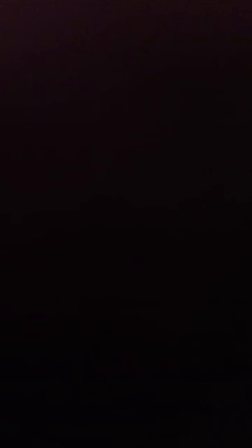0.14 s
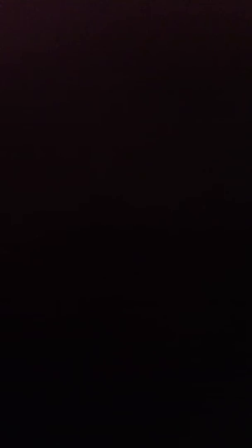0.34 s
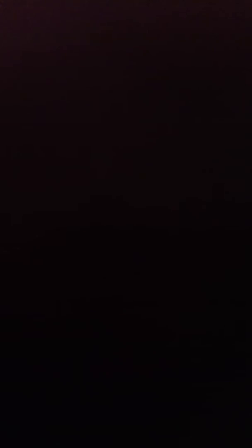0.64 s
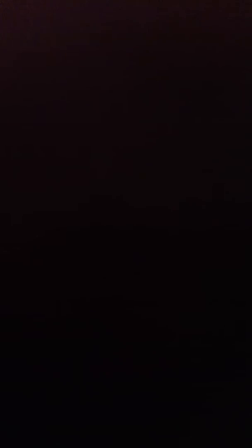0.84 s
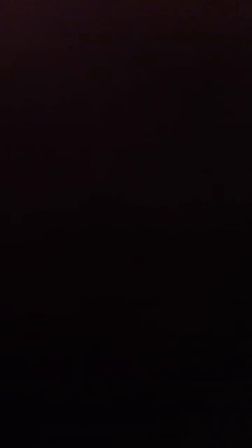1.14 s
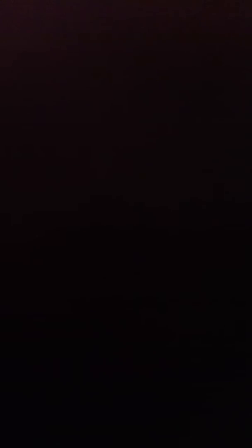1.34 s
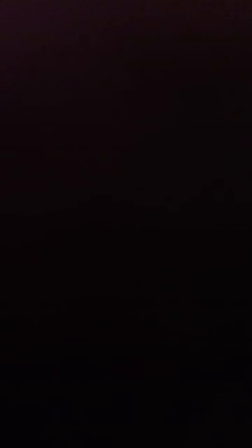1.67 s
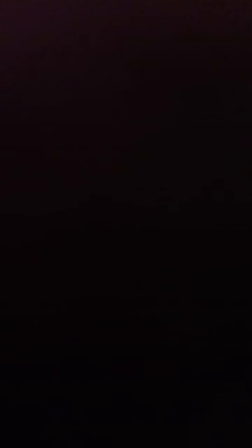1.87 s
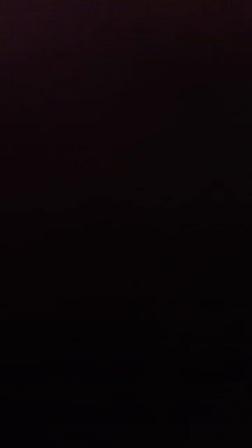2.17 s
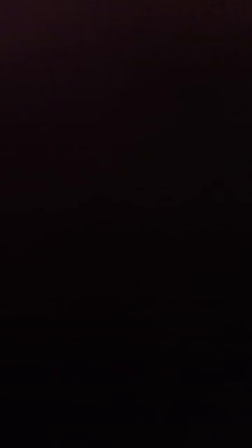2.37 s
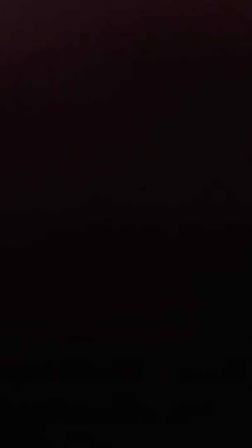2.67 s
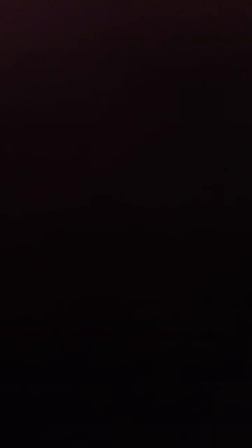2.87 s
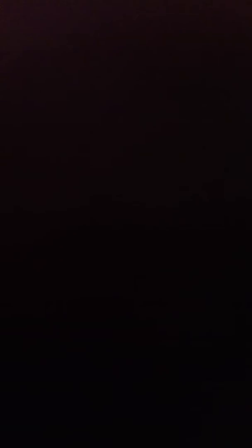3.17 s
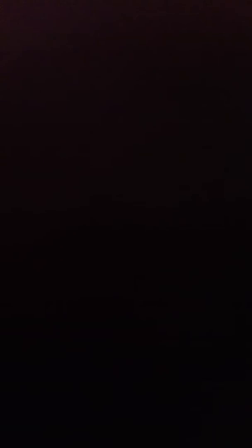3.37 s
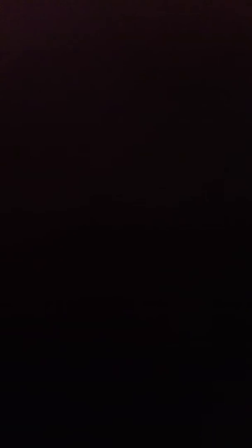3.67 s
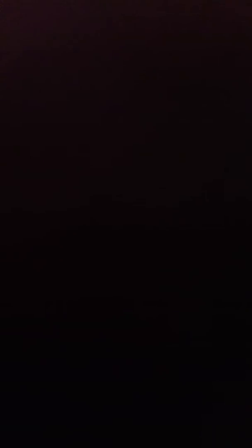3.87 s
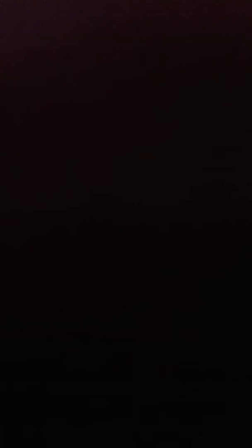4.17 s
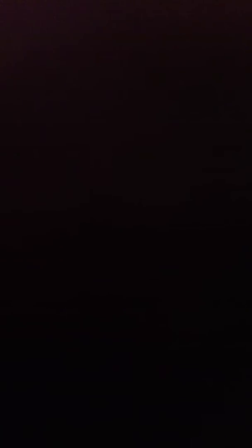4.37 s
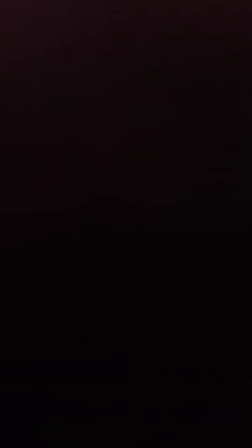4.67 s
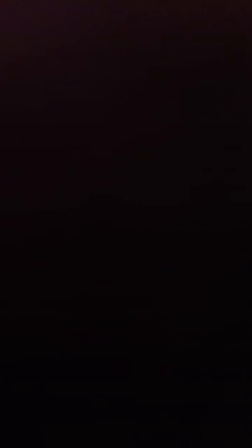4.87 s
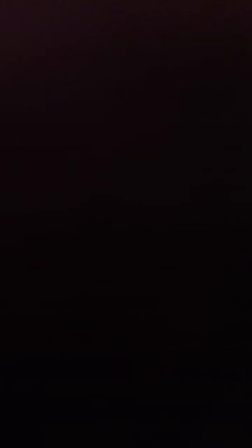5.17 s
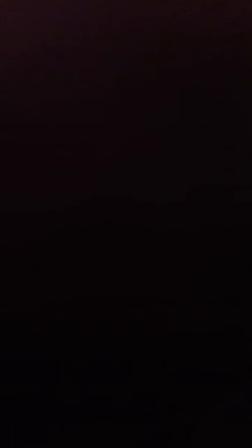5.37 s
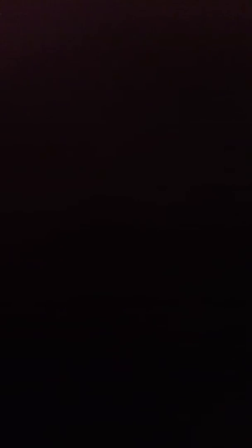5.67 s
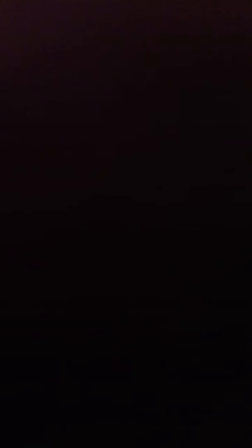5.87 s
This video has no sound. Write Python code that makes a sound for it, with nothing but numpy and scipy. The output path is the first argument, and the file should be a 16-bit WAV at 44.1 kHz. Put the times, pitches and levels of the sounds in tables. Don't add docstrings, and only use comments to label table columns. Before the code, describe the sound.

Very close microphone in a quiet room. Soft, crackly cloth brushes come first, then a sudden latch-like knock rattles. A hollow wooden object drags roughly over a surface for about two seconds, booming, hissing and bumping. After a brief lull, a bump starts a shorter, juddering drag, ending in a dull edge rub and faint rustling.

```python
import sys
import numpy as np
from scipy import signal
from scipy.io import wavfile
from scipy.ndimage import uniform_filter1d

SR = 44100
rng = np.random.default_rng(int(sys.argv[2]) if len(sys.argv) > 2 else 0)


def gain_from_decibels(decibels):
    exponent = np.asarray(decibels, float) / 20
    return 10 ** exponent


def unload_audio(sound):
    columns = np.transpose(np.atleast_2d(sound))
    steps = np.round(np.clip(columns, -1, 1) * 32767)
    wavfile.write(sys.argv[1], SR, steps.astype(np.int16))


N = 265482


def rms_one(x):
    return x / np.sqrt(np.mean(x ** 2) + 1e-20)


def at_hz(points, hz):
    table = np.array(points)
    return np.interp(np.log(hz), np.log(table[:, 0]), table[:, 1])


def drift(rate_hz):
    r = np.exp(-80 * np.pi * rate_hz / SR)
    noise = rng.standard_normal(N // 40 + 2002)
    slow = signal.lfilter([1], [1, -2 * r, r * r], noise)[2000:]
    return np.interp(np.arange(N) / 40, np.arange(len(slow)), rms_one(slow))


def resonate(x, hz, width_hz):
    r = np.exp(-np.pi * width_hz / SR)
    feedback = [1, -2 * r * np.cos(2 * np.pi * hz / SR), r * r]
    return signal.lfilter([(1 - r * r) / 2, 0, (r * r - 1) / 2], feedback, x)


def grit(per_s, spread_db):
    sizes = gain_from_decibels(spread_db * np.minimum(rng.exponential(1, N), 5)) * rng.choice([-1, 1], N)
    return rms_one(sizes * (rng.random(N) < per_s / SR))


EDGES_HZ = 24 * 2 ** np.arange(0, 9.7, 1 / 3)


def bands(x, low_hz=0, high_hz=SR):
    for k, (low, high) in enumerate(zip(EDGES_HZ, EDGES_HZ[1:])):
        centre = np.sqrt(low * high)
        if low_hz < centre < high_hz:
            band = signal.butter(2, [low, high], "band", fs=SR, output="sos")
            yield centre, (-1) ** k * signal.sosfilt(band, x)


def coloured(x, spectrum, patchy_db, rate_hz):
    out = 0
    for hz, part in bands(x, spectrum[0][0] / 2, spectrum[-1][0] * 2):
        out = out + part * gain_from_decibels(at_hz(spectrum, hz) + patchy_db * drift(rate_hz))
    return rms_one(out)


def strokes(rows, tilts, early, narrow, linger_s):
    power = np.full(N, 1e-30)
    for s, length, db, *colour_db in rows:
        i = np.arange(max(0, round(s * SR)), min(N, round((s + length) * SR)))
        way = np.clip((i / SR - s) / length, 0, 1)
        swell = np.abs(np.sin(np.pi * way ** early)) ** narrow
        power[i] += (gain_from_decibels(db + np.dot(tilts, colour_db)) * swell) ** 2
    r = np.exp(-1 / (linger_s * SR))
    return np.sqrt(signal.lfilter([1 - r], [1, -r], power))


def body(push, modes, wander_db):
    force = push * grit(per_s=5000, spread_db=3.5) + 1e-18
    out = 0
    for k, (hz, width_hz, db) in enumerate(modes):
        share = gain_from_decibels(db + wander_db * drift(4.7))
        out = out + resonate(share * force, hz, width_hz) * (-1) ** k / np.sqrt(width_hz)
    total_power = sum(gain_from_decibels(2 * db) for hz, width_hz, db in modes)
    return out / np.sqrt(np.pi / SR * total_power)


# pitch in Hz, level in dB.
ROOM_COLOUR = [(12, -44), (20, -11), (107, 1), (191, -1), (395, -5.5), (467, -8), (838, -13.5),
               (1050, -14.5), (1200, -14), (1590, -16), (2560, -17), (11500, -19.5), (15600, -26.5)]
# pitch in Hz, level in dB.
WHINE = [(11702, -84.5)]


def room_tone():
    out = gain_from_decibels(-56) * coloured(rng.standard_normal(N), ROOM_COLOUR, patchy_db=2.0, rate_hz=2.0)
    for hz, db in WHINE:
        out = out + gain_from_decibels(db + 7.5) * np.sin(2 * np.pi * hz * np.arange(N) / SR)
    return out


# start in seconds, length in seconds, level in dB, brightness in dB, body in dB.
BRUSHES = [(-.06, 0.11, -57, 9, 4), (.03, .1, -50.5, -2, 4.5), (.14, 0.16, -62, 2, 2.5),
           (.58, 0.13, -61, 2, 0), (.66, 0.21, -60.5, -1, -1.5), (1.05, 0.058, -51, -2, -0.5),
           (1.14, 0.098, -51, -2, 2), (1.33, 0.076, -48.5, -2.5, -0.5), (1.37, 0.15, -48.5, 0, -0.5),
           (1.59, .07, -52.5, -1.5, -7), (1.63, 0.23, -45, 0.5, 1), (4.15, 0.083, -53.5, 1.5, -2.5),
           (4.38, 0.076, -73, 10, -8), (5.47, 0.072, -65, -4.5, -2), (5.57, 0.15, -59.5, -3, 0),
           (5.78, 0.082, -54.5, -1, -4), (5.87, 0.11, -65, -5.5, 0)]
# pitch in Hz, level in dB per Hz.
CLOTH_DULL = [(200, -17), (350, 1), (600, -2.5), (850, -3.5), (1300, -37)]
CLOTH_MIDDLE = [(600, -26), (950, 0), (1700, 1), (2600, 0.5), (3800, -25)]
CLOTH_BRIGHT = [(1590, -36), (2700, -10), (3290, -1.5), (4790, -3.5), (8250, -8), (12000, -17),
                (15600, -37)]


def cloth():
    fibres = grit(per_s=12000, spread_db=0.0) * gain_from_decibels(1.2 * drift(21))
    # colour, weights of brightness and body, level in dB
    parts = ((CLOTH_DULL, [-1, 0], 0.5), (CLOTH_MIDDLE, [0, 1], 0.1), (CLOTH_BRIGHT, [1, 0], -0.5))
    out = 0
    for colour, tilts, db in parts:
        hand = strokes(BRUSHES, tilts, early=0.66, narrow=2.03, linger_s=0.02)
        out = out + gain_from_decibels(db) * hand * coloured(fibres, colour, patchy_db=2.5, rate_hz=10)
    return out


# moment in seconds, peak in dB, pitch in Hz, brightness in dB.
BUMPS = [(0.61, -36, 119, 0), (2.039, -16.5, 480, -12), (2.372, -24, 354, -10), (2.693, -15.5, 332, -17),
         (2.829, -10, 275, -26), (2.879, -13, 395, -21), (2.905, -7.5, 330, -15), (3.186, -7.5, 355, -5),
         (3.219, -13, 387, -19), (3.911, -12, 344, -13), (4.254, -33.5, 158, -14), (4.599, -34, 213, 10),
         (4.689, -28.5, 603, -16), (4.784, -7, 364.6, 6.5), (4.809, -9, 371, -18), (4.899, -17, 388, -10),
         (4.954, -12, 369, -11), (5.084, -22, 370, -8), (5.214, -14, 358, -15)]
# pitch in Hz, width in Hz, level in dB.
PANEL = [(457, 52, -2), (529.3, 39, -1.5), (589.5, 13, -2.5), (638, 42, -1.5), (698, 34, -4),
         (770, 35, -2.5), (876, 74, -0.5), (937, 40, -2), (992, 35, -4.5), (1088, 45, 1), (1143, 61, -3.5),
         (1254, 43, -3), (1365, 37, -10.5), (1432, 42, -10.5)]


def bumps():
    out, ticks = np.zeros(N), np.full(N, 1e-18)
    t = np.arange(int(.12 * SR)) / SR
    swell = (1 - np.exp(-t / 0.0036)) * gain_from_decibels(-60 * t / 0.077)
    for s, db, hz, bright_db in BUMPS:
        i = round(s * SR)
        ring = np.sin(2 * np.pi * hz * t * (1 + 0.79 * t))
        out[i:i + len(t)] += gain_from_decibels(db - 4.0) * swell * ring
        ticks[i] = gain_from_decibels(db + bright_db + 16)
    soft = signal.lfilter([.12], [1, -.88], ticks)
    for k, (hz, width_hz, db) in enumerate(PANEL):
        out = out + gain_from_decibels(db) * resonate(soft, hz, 0.58 * width_hz) * (-1) ** k
    return out


# start in seconds, length in seconds, upper modes in dB, deep over upper modes in dB.
RUMBLES = [(1.6, 0.29, -55, -4), (1.96, 0.37, -41, -7), (2.3, 0.34, -38, -20), (2.66, .22, -35, -9),
           (2.88, 0.24, -39.5, -3), (3.1, 0.16, -46, 1.5), (3.2, 0.13, -43.5, -15), (3.32, 0.12, -58.5, 15),
           (3.45, .23, -47.5, -18), (3.7, 0.53, -44, -2), (4.15, .35, -55.5, -7), (4.55, 0.22, -53.5, -2),
           (4.68, 0.11, -47, 1), (4.78, 0.047, -35.5, 4.5), (4.85, 0.25, -39, -1.5),
           (5.03, 0.28, -40.5, -14), (5.4, 0.19, -59, -9)]
# pitch in Hz, width in Hz, level in dB.
DEEP_BOOM = [(74.6, 23, -12.5), (94, 23, -9), (123.6, 16.4, 3)]
UPPER_BOOM = [(159, 10.7, -5.5), (167.8, 12.4, -2.6), (204, 13.4, -1.5)]


def rumble(weight):
    steady = gain_from_decibels(-20) * weight
    upper, deep = (np.hypot(steady, strokes(RUMBLES, [k], early=0.38, narrow=0.54, linger_s=.015))
                   for k in range(2))
    return body(deep, DEEP_BOOM, wander_db=0.5) + body(upper, UPPER_BOOM, wander_db=2.5)


def dense_modes(x, t60, ring_db, top_hz):
    t = np.arange(SR // 8) / SR
    ring = gain_from_decibels(ring_db) * rng.standard_normal(len(t)) * gain_from_decibels(-60 * t / t60)
    ring = signal.sosfilt(signal.butter(2, top_hz, fs=SR, output="sos"), ring)
    ring[0] = 1
    return rms_one(signal.fftconvolve(x, ring)[:N])


# pitch in Hz, level in dB per Hz.
SURFACE = [(880, -8.5), (1330, -3.5), (1560, -11), (1770, 0.5), (2230, -6), (2740, -4), (4570, -7.5),
           (6000, -19.5), (7800, -19), (13200, -120)]
SURFACE_TOP = [(3240, -56), (5500, 1), (10100, -5), (11600, -7.5), (15600, -30)]
# pitch in Hz, width in Hz, level in dB.
SURFACE_PEAKS = [(1780, 60, -9), (2100, 80, -9), (2650, 80, -7), (3460, 150, -7), (4400, 600, -4)]


def surface_hiss(level):
    grains = dense_modes(grit(per_s=15000, spread_db=2.5), t60=.12, ring_db=-27, top_hz=5000)
    plain = coloured(grains, SURFACE, patchy_db=2.45, rate_hz=1.8)
    peaks = sum(gain_from_decibels(db) * resonate(plain, hz, width_hz) for hz, width_hz, db in SURFACE_PEAKS)
    fine = gain_from_decibels(-11.5) * coloured(grains, SURFACE_TOP, patchy_db=0.1, rate_hz=13.0)
    return level * (rms_one(plain + peaks) + fine)


def slide_levels(tables):
    t = np.arange(N) / SR
    total = 0
    for s, *columns in map(np.transpose, tables):
        fall_db = 168 * np.maximum(t - s[-1], 0)
        total = total + np.array([gain_from_decibels(np.interp(t, s, db, left=-150) - fall_db) for db in columns])
    return total


# moment in seconds, sliding speed as hiss in dB, weight on the surface as panel dB.
DRAGS = [
    [(1.99, -48, -40.5), (2.26, -38, -37.5), (2.45, -46.5, -42), (2.6, -41.5, -36.5), (2.76, -36.5, -33),
     (2.93, -33.5, -35), (3.4, -36, -34), (3.91, -38, -32.5), (4.1, -55, -48.5)],
    [(4.784, -43.5, -33), (4.84, -41.5, -37), (4.91, -37, -35.5), (5.0, -43, -39), (5.1, -60, -36),
     (5.24, -68, -38.5), (5.33, -91, -55.5), (5.46, -90, -78)],
]
# start in seconds, length in seconds,
# panel level in dB, cavity over panel in dB, contact nearer the thin end in dB.
CATCHES = [(1.99, 0.15, -39, 2, 0), (2.18, 0.16, -37.5, -19, 1.5), (2.35, 0.19, -37.5, 2, -1.5),
           (2.66, 0.21, -38.5, 11, -8.5), (2.76, 0.21, -30.5, 4.5, -2.5), (2.85, 0.2, -27, 9, 0),
           (3.175, 0.15, -31.5, 4.5, 2), (3.33, 0.14, -37.5, 4, 6.5), (3.5, 0.27, -39, -21, 7),
           (3.64, 0.19, -33, 0, -0.5), (3.89, 0.088, -41, 8, 5), (4.02, 0.068, -50, 3, -7),
           (4.58, 0.086, -59.5, 8, -3), (4.675, 0.05, -41.5, 0, 0.5), (4.73, 0.087, -49.5, -1, 0),
           (4.782, 0.036, -33.5, 9, -4), (4.82, .12, -34, -17, 3.5), (4.88, 0.044, -30.5, 1.5, -1.5),
           (4.94, 0.038, -35, 7, -2), (5.05, .14, -36.5, 11.5, -5), (5.2, 0.052, -38.5, 8.5, -1.5),
           (5.26, 0.078, -51, 3, -4), (5.33, 0.11, -65, 4, -7)]
# pitch in Hz, width in Hz, level in dB.
CAVITY = [(252, 89, -5), (275, 17, 1), (317.4, 4.1, -3.5), (355.6, 16.4, 2), (386.6, 9.7, 1.5),
          (406, 43, -3)]


def drag():
    speed, weight = slide_levels(DRAGS)
    thick, thin = (np.hypot(weight, strokes(CATCHES, [0, k], early=0.52, narrow=0.5, linger_s=0.0069))
                   for k in (-1, 1))
    cavity_catches = strokes(CATCHES, [1, 0], early=0.64, narrow=2.74, linger_s=0.0044)
    cavity = np.hypot(gain_from_decibels(-3.5) * weight, cavity_catches)
    hiss = np.hypot(speed, gain_from_decibels(-16) * thin)
    judder = drift(23.0)
    panel_shake = gain_from_decibels(1.0 * judder - 3)
    hollow = body(cavity * gain_from_decibels(1.5 * judder), CAVITY, wander_db=1.5)
    thick_end = body(thick * panel_shake, PANEL[:6], wander_db=1.8)
    thin_end = body(thin * panel_shake, PANEL[6:], wander_db=1.8)
    return rumble(weight) + hollow + thick_end + thin_end + gain_from_decibels(0.36 * judder) * surface_hiss(hiss)


# pitch in Hz, level in dB per Hz.
KNOCK = [(88, -53), (150, -2.5), (257, 1), (1110, 0), (1600, -6), (2020, -3.5), (3090, -8.5), (3970, -9),
         (11200, -35), (15000, -40)]
# pitch in Hz, time to fall by 60 dB in seconds.
KNOCK_T60 = [(200, 0.35), (1000, 0.26), (3000, 0.19), (12000, 0.13)]


def knock():
    start_s, level_db, rise_s = 1.9535, -21, 0.011
    t = np.clip(np.arange(N) / SR - start_s, 0, 1)
    out = 0
    for hz, part in bands(grit(per_s=7600, spread_db=2.5)):
        rise = 1 - np.exp(-t / (rise_s * (1000 / hz) ** 0.71))
        out = out + part * gain_from_decibels(at_hz(KNOCK, hz) - 60 * t / at_hz(KNOCK_T60, hz)) * rise
    return gain_from_decibels(level_db + 13.5) * signal.sosfilt(signal.butter(4, 11500, fs=SR, output="sos"), out)


# start in seconds, length in seconds, low band in dB, high over low band in dB.
EDGE_RUB = [
    (4.97, 0.25, -49.5, -1),
    (5.2, 0.044, -43.5, -8.5),
]
# pitch in Hz, width in Hz, level in dB.
EDGE_LOW = [(1640, 270, 0.5), (2080, 110, 1), (2670, 180, -16)]
EDGE_HIGH = [(7060, 930, -0.13), (8200, 2300, -0.87)]


def edge_rub():
    low, high = (strokes(EDGE_RUB, [k], early=.8, narrow=.5, linger_s=.008) for k in range(2))
    return body(low, EDGE_LOW, wander_db=1.5) + body(high, EDGE_HIGH, wander_db=1.5)


# start in seconds, pitch in Hz, width in Hz, level in dB.
SQUEAK = (5.96, 2620, 30, -65)


def squeak():
    s, hz, width_hz, db = SQUEAK
    push = gain_from_decibels(db) * np.clip((np.arange(N) / SR - s) / .025, 0, 1)
    return body(push, [(hz, width_hz, 0)], wander_db=1.5)


def scene():
    return (room_tone() + cloth() + bumps() + drag() + knock() + edge_rub() + squeak())[None]


# start in seconds, end in seconds.
DULL_S = (1.9412, 1.9508)


def dull_before_knock(x):
    t = np.arange(N) / SR
    lost = uniform_filter1d(1. * (t > DULL_S[0]) * (t < DULL_S[1]), size=40)
    lows = signal.sosfiltfilt(signal.butter(6, 600, fs=SR, output="sos"), x)
    return x + lost * (lows - x)


def treble_holes(x, from_hz, quiet_db, loud_db, most):
    hz, s, z = signal.stft(x, SR, nperseg=2048)
    level_db = 10 * np.log10(np.sum(np.abs(z) ** 2, axis=-2) + 1e-12)
    loudness = 0.11 + np.clip((level_db - quiet_db) / (loud_db - quiet_db), 0, 1)
    height = np.clip((hz - from_hz) / 5800, 0, 1)[:, None] ** 2.0
    draw = rng.random((len(hz) // 7 + 1, len(s) // 2 + 1))
    draw = np.repeat(np.repeat(draw, 2, axis=1), 7, axis=0)[:len(hz), :len(s)]
    keep = draw > most * loudness[:, None] * height
    return signal.istft(z * keep, SR, nperseg=2048)[1][:, :N]


def low_pass(x):
    return signal.sosfilt(signal.butter(12, 15800, fs=SR, output="sos"), x)


def record(dry):
    x = signal.sosfilt(signal.butter(2, 38, "high", fs=SR, output="sos"), dry)
    x = dull_before_knock(x)
    x = treble_holes(x, from_hz=8900, quiet_db=-52, loud_db=-38, most=0.43)
    return low_pass(x)


dry = scene()
out = record(dry)
unload_audio(out)
```